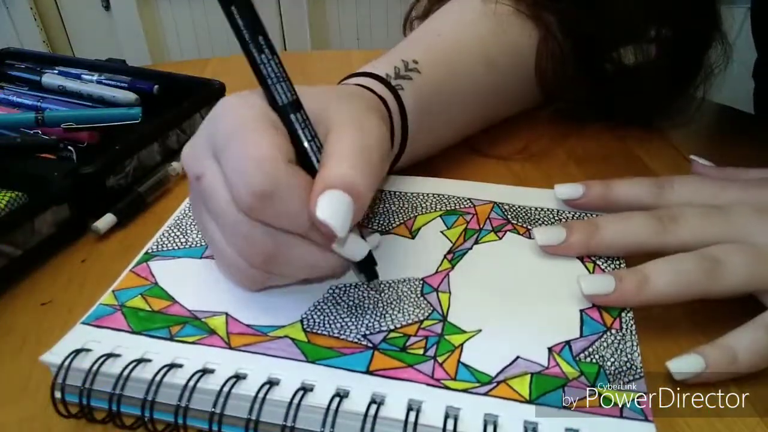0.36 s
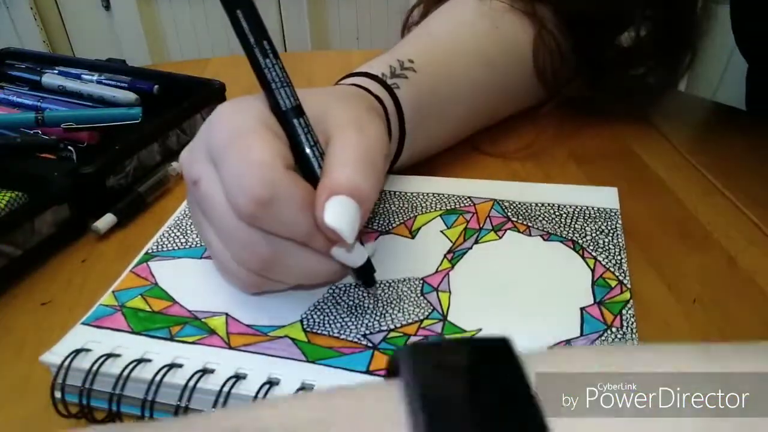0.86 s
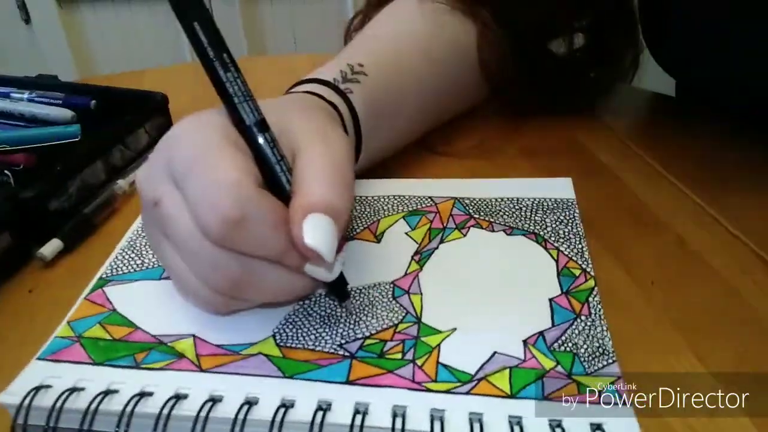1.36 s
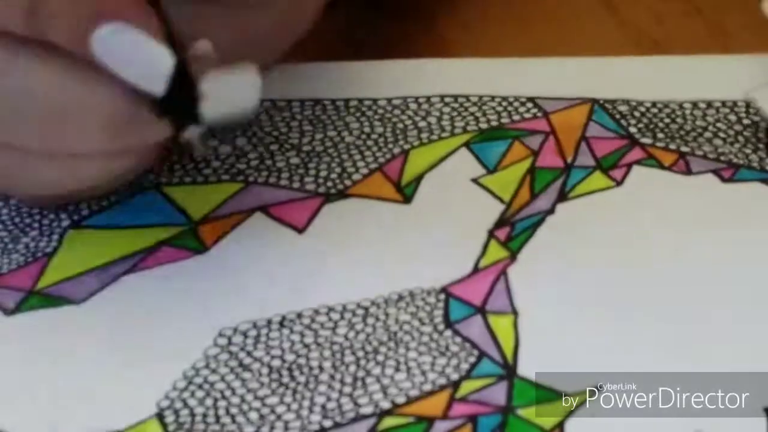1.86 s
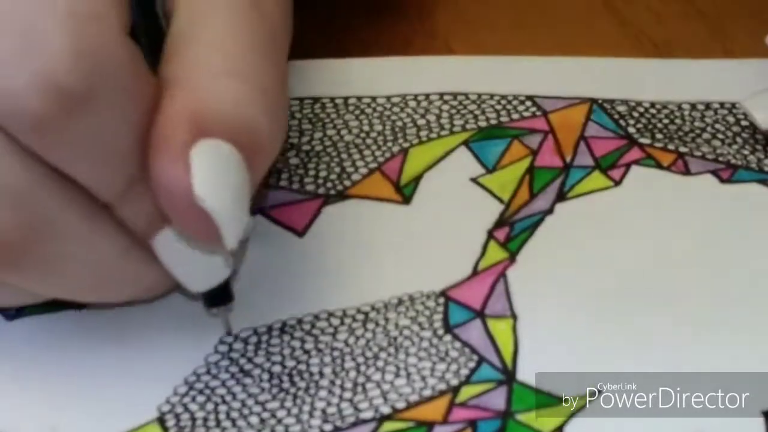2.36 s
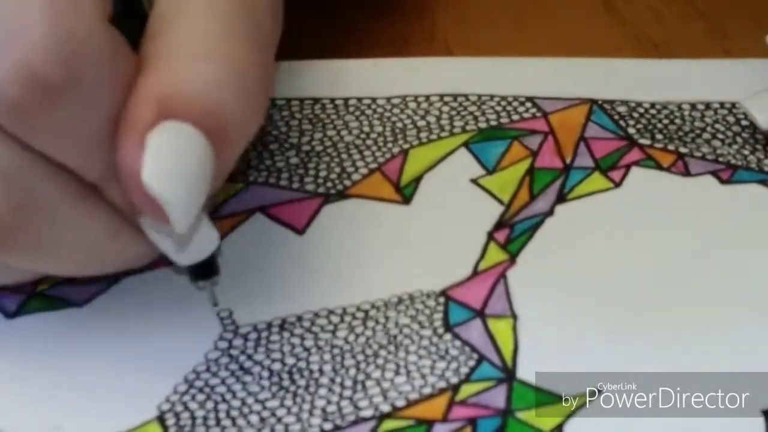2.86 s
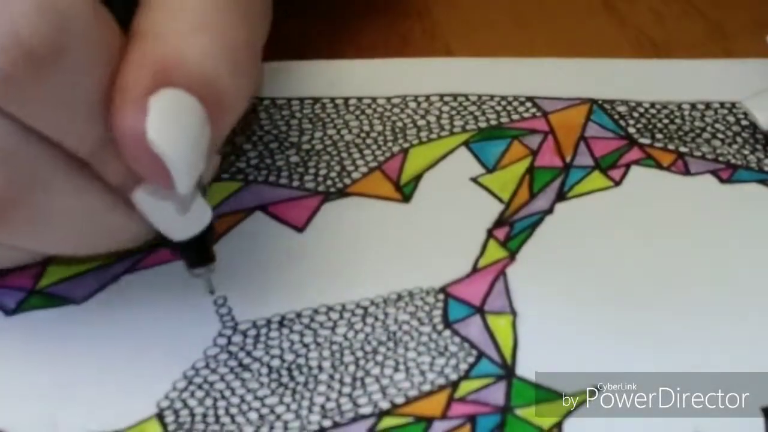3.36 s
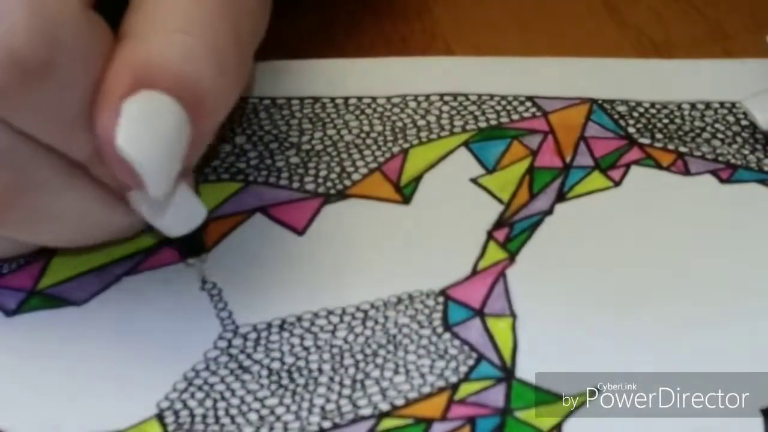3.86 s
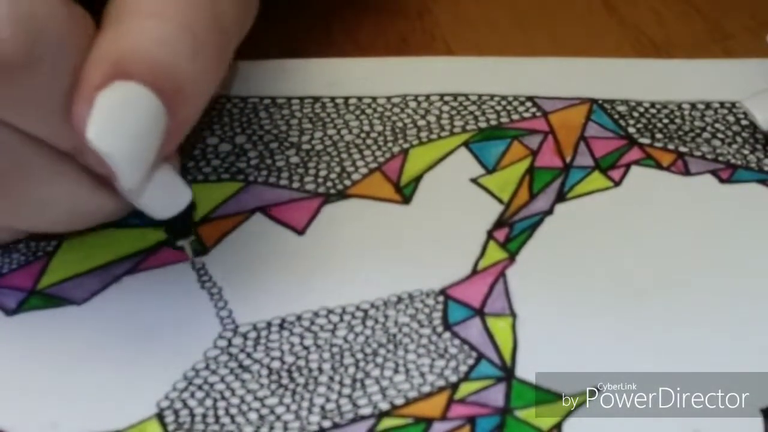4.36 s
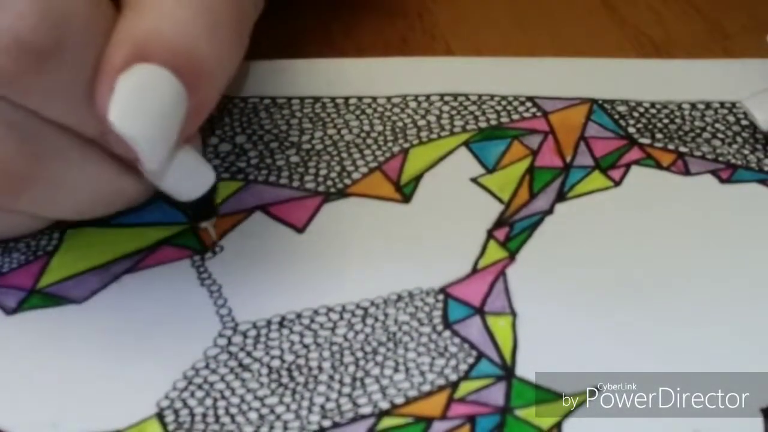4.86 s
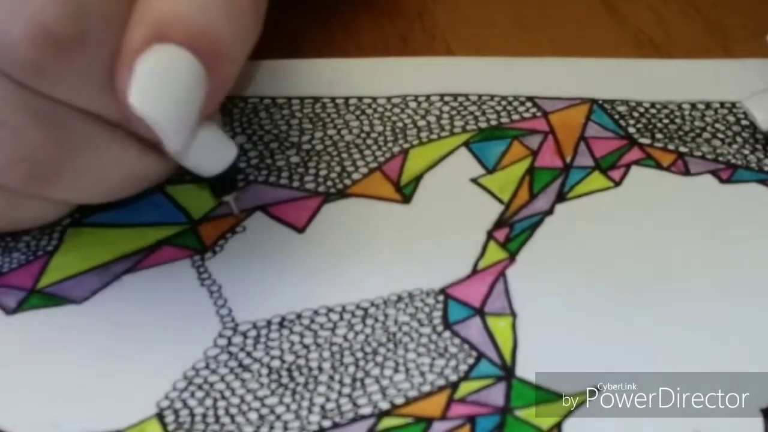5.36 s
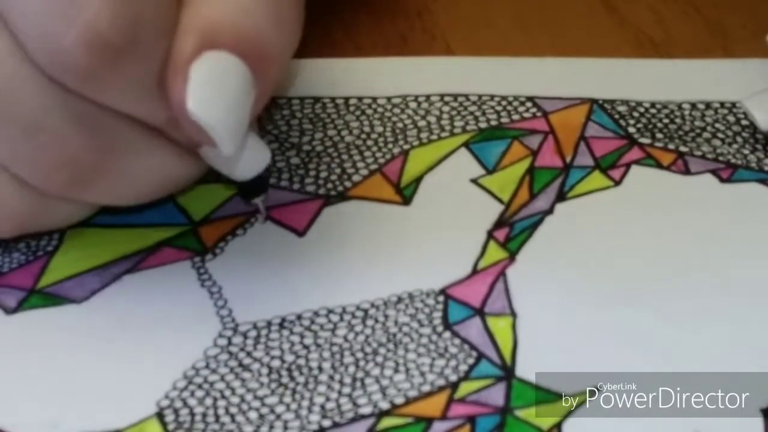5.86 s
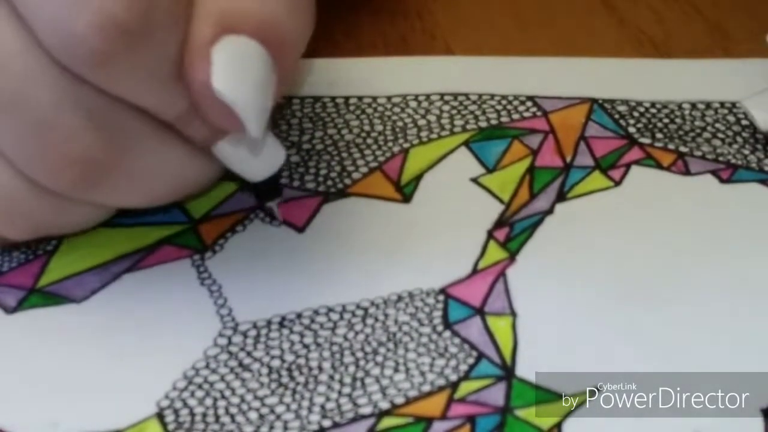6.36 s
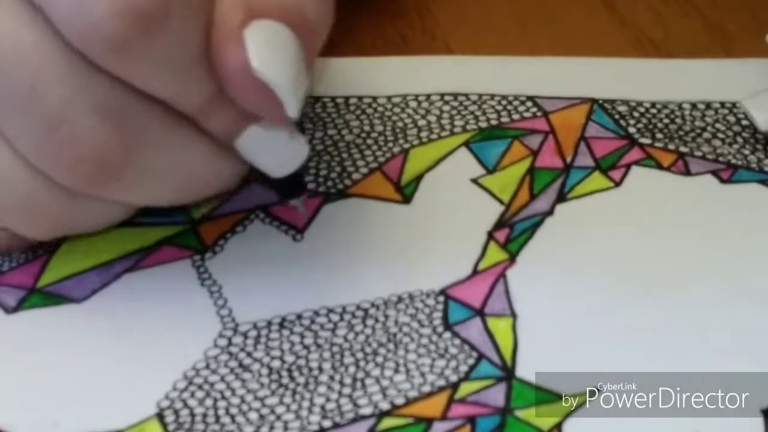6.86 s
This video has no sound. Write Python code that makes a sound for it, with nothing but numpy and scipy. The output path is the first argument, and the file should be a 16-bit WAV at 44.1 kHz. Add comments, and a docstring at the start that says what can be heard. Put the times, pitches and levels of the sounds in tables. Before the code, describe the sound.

Close, dry pen clicks and brief papery rasps as tiny circles are drawn on a pad, irregular and rapid, one knock standing out early.

```python
"""Fine pen on a sketch pad

A fine pen tip draws tiny circles on a thick pad lying on a wooden table, close to a small microphone.
Knocks of the landing, closing and slipping tip are bursts of tiny impacts ringing pad, pen and table.
Between them clumped fibre impacts rasp; low noise is the rumble of hand and room.
A noise gate turns the quiet moments down between strokes."""
import sys
import numpy as np
from scipy import signal
from scipy.io import wavfile
from scipy.ndimage import uniform_filter1d

SR = 44100
rng = np.random.default_rng(int(sys.argv[2]) if len(sys.argv) > 2 else 0)


def transcribe(u):
    """Save the signal u as a 16-bit wav file named by the first command-line argument.

    u: samples, shape (n,) or (channels, n), limited to [-1, 1]; the rate is SR.
    q: integer samples, one column per channel.
    """
    v = np.clip(np.atleast_2d(u).T, -1, 1)
    q = np.round(v * 32767).astype(np.int16)
    wavfile.write(sys.argv[1], SR, q)


def gain_from_db(level_db):
    """Convert decibel levels to linear amplitude factors (20 dB per decade)."""
    decades = np.asarray(level_db, float) / 20
    return 10 ** decades


N = 308259

# resonances of pad and pen, the tip itself last: (centre [Hz], width [Hz], level [dB])
RESONANCES = [(670, 33, -4), (1012, 55, 0.5), (1508.5, 67, -0.5), (2300, 83, -15.5), (3610, 1000, -5),
              (4140, 210, 0), (7528, 460, 11)]
TIP_HZ = RESONANCES[-1][0]


def evened(x):
    """Scales to rms 1."""
    return x / np.sqrt(np.mean(x ** 2) + 1e-20)


def add(mix, start_s, sound):
    """Mixes a sound in at start_s, cut at the end of the mix."""
    part = mix[max(round(start_s * SR), 0):][:len(sound)]
    part += sound[:len(part)]


def colour(points, size=4096):
    """Minimum-phase impulse response with the given spectrum."""
    f, db = np.transpose(points)
    hz = abs(np.fft.fftfreq(size, 1 / SR))
    spectrum_db = np.interp(np.log(hz + 1), np.log(f), db, left=-70, right=-90)
    log_gain = np.log(gain_from_db(spectrum_db))
    return np.fft.ifft(np.exp(np.conj(signal.hilbert(log_gain)))).real[:size // 2]


def resonate(x, hz, width_hz):
    """One-pole complex resonance of gain 1 at hz."""
    r = np.exp(-np.pi * width_hz / SR)
    pole = r * np.exp(2j * np.pi * hz / SR)
    return 2 * signal.lfilter([1 - r], [1, -pole], x).real


def grit(size, per_s, spread_db):
    """Sparse tiny impacts of random sign, a few of them large."""
    chance, sign, height = rng.random((size, 3)).T
    hits = chance < per_s / SR
    return hits * np.sign(sign - 0.5) * gain_from_db(-spread_db * np.log(height + 0.009))


def body(x, shift=0):
    """Pad and pen ring briefly; where the tip touches shifts each resonance in pitch and strength."""
    pitch, strength = shift * rng.standard_normal((len(RESONANCES), 2)).T
    pitch[-1] *= 0.3  # the tip itself nearly keeps its pitch
    out = x
    for (hz, width_hz, db), f, a in zip(RESONANCES, pitch, strength):
        out = out + gain_from_db(db + 1.3 * a) * resonate(x, hz * (1 + 0.068 * f), width_hz)
    return out


def table_thud(t):
    """Decaying modes of the table, stirred differently by each knock, swelling more slowly than the paper."""
    # modes of the table: (pitch [Hz], level [dB], t60 [s])
    modes = [(129, -7, 0.13), (165, -0.5, 0.071), (215, 1.5, 0.042), (323, -9, .04), (480, -4, 0.026)]
    spread_db, swell_s = 2, 0.004
    thud = np.zeros(len(t))
    for hz, db, t60_s in modes:
        level = gain_from_db(db + spread_db * rng.standard_normal() - 60 * t / t60_s)
        cycles = hz * rng.uniform(0.94, 1.08) * t + rng.random()
        thud += level * np.sin(2 * np.pi * cycles)
    thud = thud * (1 - np.exp(-t / swell_s))
    return thud / abs(thud).max()


def tick(peak_db, ring_hz, sharp_db, thud_db, t60_s, pad):
    """The tip chatters for a few ms, then the fibres and pages settle in sparse crackles."""
    touch_s, first_blow, first_blow_s = 0.0008, 0.61, 0.0025
    split_hz = 5200
    t = np.arange(5000) / SR
    t60_s = np.clip(t60_s, 0.006, 0.1)

    onset = np.minimum(t / touch_s + 0.22, 1)
    blow = 1 + first_blow * np.exp(-t / first_blow_s)  # first contact is harder than the chatter
    chatter = onset * blow * gain_from_db(-60 * np.maximum(t - 0.037 * t60_s, 0) / t60_s)
    settling = gain_from_db(-17.5 - 60 * t / (0.042 + 0.39 * t60_s))
    contact = chatter * evened(grit(len(t), per_s=8100, spread_db=5))
    contact = contact + settling * evened(grit(len(t), per_s=1700, spread_db=8))

    knock = body(signal.oaconvolve(contact, pad)[:len(t)], shift=0.51)
    knock = knock + gain_from_db(2.5) * resonate(knock, ring_hz, 230)
    low = signal.sosfilt(signal.butter(3, split_hz, fs=SR, output="sos"), knock)
    high = signal.sosfilt(signal.butter(3, split_hz, "high", fs=SR, output="sos"), knock)
    # the treble fades first while the tip keeps ringing
    high = high * (gain_from_db(-60 * t / 0.039) + 0.18) + 0.24 * resonate(high, TIP_HZ, 1500)
    knock = low / abs(low).max() + gain_from_db(sharp_db) * high / abs(high).max()
    return gain_from_db(peak_db) * (knock + gain_from_db(thud_db) * table_thud(t))


def ticks():
    """Every landing, closing and slip of the tip; the fainter slips are duller."""
    # peak: of the part below 5200 Hz; sharpness (peak above 5200 Hz) and thud are relative to it
    # tip comes down: (time [s], peak [dB], strongest pad ring [Hz], table thud [dB], sharpness [dB])
    landings = [(0.228, -16, 2210, -20.5, 1), (0.441, -10, 1780, -29, -7), (0.687, -9, 2660, -34, -9),
                (0.822, -3, 1960, -33, -8), (1.084, -12, 2140, -31.5, -2), (1.3, -8, 2330, -37, -9),
                (1.668, 5, 2030, -27, -6), (2.24, -1, 3430, -29.5, -11), (2.419, -4.5, 2240, -36.5, -10.5),
                (2.597, -7, 1670, -27.5, -6), (2.803, -6, 1680, -36, -11), (2.936, -14, 2360, -20, -10),
                (3.086, -16, 1420, -29.5, -6), (3.286, -9, 2380, -27, -17.5),
                (3.528, -4.5, 2990, -43, -9.5), (3.84, -8, 3390, -27.5, -8), (4.036, -5, 2130, -37.5, -6.5),
                (4.39, -8, 2350, -32.5, -7.5), (4.678, -6, 2276, -32, -4.5),
                (4.846, -10.5, 2660, -33.5, -20), (5.063, -11.5, 2240, -40, -7.5),
                (5.253, -9.5, 2530, -21.5, -8), (5.413, -17.5, 2370, -28.5, 0),
                (5.694, -13.5, 1940, -34, -8.5), (5.942, -13, 2550, -30, -12.5),
                (6.191, -7, 2270, -32.5, -4.5), (6.417, -6.5, 2190, -43, -7),
                (6.678, -15.5, 1490, -44, -9.5), (6.802, -6, 2430, -48.5, -9.5)]
    # light snaps, mostly as a circle closes:
    # (time [s], peak [dB], strongest pad ring [Hz], sharpness [dB], t60 [s])
    closings = [(0.06, -10.5, 3280, -8, 0.037), (0.312, -15, 2160, -3.5, 0.052),
                (0.524, -8.5, 2080, -8, 0.032), (0.87, -13.5, 1980, -3.5, 0.034),
                (0.939, -15.5, 2180, -8, 0.038), (1.168, -11, 2100, -5.5, 0.038),
                (1.379, -12, 2180, -3, 0.053), (1.736, -12, 2990, -4, 0.051),
                (2.036, -10.5, 2370, -7.5, 0.019), (2.32, -8, 2100, -6, 0.039),
                (2.498, -14.5, 1910, -5, 0.039), (2.69, -9, 2170, -17, 0.015),
                (2.887, -14, 2780, -12, 0.034), (3.058, -18.5, 2270, -17, 0.021),
                (3.18, -14.5, 2150, -8, 0.04), (3.378, -6.5, 3750, -7.5, 0.019),
                (3.615, -8.5, 3100, -5.5, 0.033), (3.834, -13, 3180, -2.5, 0.028),
                (3.941, -24, 1810, -9, 0.049), (4.12, -14, 2350, -6.5, 0.046),
                (4.255, -13.5, 3000, 0, 0.024), (4.35, -22.5, 2310, -4, 0.036),
                (4.491, -14, 2350, -8.5, 0.038), (4.77, -16, 1660, -4, 0.052),
                (4.979, -33, 1530, -17.5, 0.072), (5.143, -9.5, 2340, -9, 0.036),
                (5.358, -10, 3850, -6, 0.011), (5.534, -14.5, 2310, -8.5, 0.038),
                (5.802, -11.5, 3070, -7, 0.045), (6.015, -13, 2330, -11, 0.028),
                (6.032, -12, 2380, -7, 0.026), (6.283, -14, 2210, -7.5, 0.029),
                (6.518, -17, 2330, -9, 0.042), (6.896, -9.5, 2570, -11, 0.044)]
    # tip rebounds or catches on a fibre: (time [s], peak [dB])
    slips = [(.238, -19.5), (0.275, -39), (.300, -47.5), (0.353, -54), (.369, -39.5), (.450, -21.5),
             (.477, -30.5), (.534, -26.5), (.555, -44.5), (0.591, -46), (.694, -13.5), (0.827, -7.5),
             (0.835, -35.5), (.877, -21.5), (0.907, -29), (1.099, -17.5), (1.109, -43), (1.114, -24.5),
             (1.122, -39), (1.31, -28), (1.319, -36), (1.336, -41.5), (1.386, -28), (1.411, -40.5),
             (1.432, -48), (1.449, -48), (1.664, -18.5), (1.691, -22), (1.712, -23.5), (1.73, -32),
             (1.757, -22), (1.784, -46), (1.987, -47), (1.991, -50), (2.057, -37), (2.074, -43.5),
             (2.105, -51), (2.331, -30), (2.504, -44.5), (2.613, -27.5), (2.619, -28), (2.627, -37),
             (2.681, -33.5), (2.708, -30.5), (2.819, -33.5), (2.896, -22.5), (2.92, -62), (3.108, -32),
             (3.300, -37), (3.308, -34), (3.319, -30.5), (3.340, -36.5), (3.384, -15), (3.858, -37),
             (3.865, -35), (3.871, -45.5), (4.263, -7), (4.386, -15), (4.41, -42), (4.416, -36),
             (4.779, -27), (4.790, -40), (4.855, -31), (4.862, -20.5), (4.993, -42), (5.076, -23.5),
             (5.114, -30), (5.259, -14.5), (5.269, -27), (5.280, -22), (5.366, -21), (5.423, -19.5),
             (5.444, -33), (5.724, -31), (5.763, -30), (5.964, -40.5), (5.974, -41), (5.998, -34),
             (6.047, -29), (6.054, -32), (6.197, -13), (6.720, -50), (6.902, -39)]
    # broad colour of pad and microphone: (frequency [Hz], level [dB])
    pad_colour = [(250, -32), (450, -19.5), (1050, -7), (2280, 0), (4300, -7.5), (5300, -10), (8700, -20.5),
                  (11000, -18), (15000, -26.5), (16400, -67.5)]
    land_t60_s, close_thud_db = 0.036, -47.5
    slip_ring_hz, slip_thud_db, slip_t60_s = 2300, -42, 0.0063
    slip_sharp_db, slip_spread_db, dulling_db_per_db = -6, 2.5, 0.25

    out, pad = np.zeros(N), colour(pad_colour)
    for s, db, hz, thud_db, sharp_db in landings:
        add(out, s, tick(db, hz, sharp_db, thud_db, land_t60_s, pad))
    for s, db, hz, sharp_db, t60_s in closings:
        add(out, s, tick(db, hz, sharp_db, close_thud_db, t60_s, pad))
    for s, db in slips:
        sharp_db = slip_sharp_db + dulling_db_per_db * db + slip_spread_db * rng.standard_normal()
        add(out, s, tick(db, slip_ring_hz, sharp_db, slip_thud_db, slip_t60_s, pad))
    return out


def rasp():
    """The tip skips over fibres: dense impacts in clumps of a few ms, each stroke with its own colour."""
    # pushes of the tip, levels ahead of paper and body resonances:
    # (time [s], length [s], start level [dB], end level [dB], strongest pad ring [Hz])
    drags = [(0.002, 0.016, -35, -59, 2030), (0.033, 0.041, -49, -51, 2300), (0.258, 0.047, -52, -53, 2120),
             (0.474, 0.05, -36.5, -53, 2000), (0.728, 0.16, -44, -85, 1030), (0.839, 0.031, -36, -60, 2360),
             (0.896, 0.034, -57, -52.5, 2300), (1.101, 0.061, -41.5, -51.5, 2230),
             (1.331, 0.043, -38.5, -47, 2360), (1.682, 0.087, -37, -53, 2200),
             (1.985, 0.079, -48, -59, 2100), (2.259, 0.055, -44, -51.5, 800),
             (2.457, 0.044, -49, -53, 2660), (2.618, 0.027, -43, -54.5, 1550),
             (2.649, 0.032, -45.5, -49, 3920), (2.842, 0.074, -50, -70, 825),
             (2.955, 0.037, -36, -82, 1070), (3.001, 0.041, -51, -70.5, 1020),
             (3.047, 0.0099, -46.5, -54, 3220), (3.1, 0.042, -34.5, -72, 2320),
             (3.142, 0.044, -44, -60, 1550), (3.29, 0.041, -33, -53.5, 2260),
             (3.336, 0.05, -50.5, -63, 1510), (3.56, 0.073, -54.5, -46, 2300),
             (3.85, 0.072, -44, -67.5, 2300), (3.92, 0.021, -64, -45.5, 4300),
             (4.071, 0.079, -40.5, -61, 1100), (4.294, 0.081, -46.5, -52.5, 1130),
             (4.4, 0.047, -29, -81, 2240), (4.446, 0.038, -65.5, -50, 870),
             (4.718, 0.072, -46.5, -68, 2380), (4.855, 0.055, -41, -74.5, 790),
             (4.903, 0.037, -42.5, -58, 2400), (4.945, 0.024, -53, -50, 3520),
             (5.1, 0.059, -43, -55.5, 2350), (5.264, 0.036, -28, -52, 1070), (5.305, 0.044, -38, -53, 2040),
             (5.426, 0.031, -33, -46.5, 2900), (5.464, 0.11, -48.5, -61, 1970),
             (5.725, 0.049, -49, -69, 2270), (5.757, 0.065, -51, -50, 1050), (5.959, 0.032, -43, -58, 1560),
             (5.995, 0.02, -53, -52, 1020), (6.226, 0.086, -45, -60.5, 2930),
             (6.454, 0.053, -44, -46.5, 3700), (6.706, 0.05, -47.5, -57, 1090),
             (6.765, 0.026, -54.5, -55, 2480), (6.839, 0.04, -50.5, -59.5, 1550),
             (6.883, 0.0079, -60, -44, 4250)]
    # colour of the rasp: (frequency [Hz], relative level [dB])
    rasp_colour = [(100, -26.5), (315, -14.5), (1100, -5), (2370, -2), (4300, -13.5), (5500, -18.5),
                   (9000, -32.5), (15000, -31.5), (16400, -50)]
    push_s, lift_s = 0.003, 0.004
    ring_db, ring_width_hz = 1, 350
    sizzle_db, sizzle_spread_db, sizzle_width_hz = 2, 5, 350

    out, paper = np.zeros(N), colour(rasp_colour)
    paper = paper / np.linalg.norm(paper)
    for s, length_s, start_db, end_db, ring_hz in drags:
        t = np.arange(0, length_s + lift_s, 1 / SR)
        fade = np.clip(np.minimum(t / push_s, (t[-1] - t) / lift_s), 0, 1)
        level = gain_from_db(start_db + (end_db - start_db) * t / length_s) * fade
        clumps = uniform_filter1d(rng.standard_normal(8000), 70)
        clumps = evened(uniform_filter1d(clumps, 70))
        fibres = (grit(8000, per_s=3000, spread_db=3) * gain_from_db(3.1 * clumps))[:len(t)]
        stroke = signal.oaconvolve(evened(fibres) * level, paper)
        stroke = stroke + gain_from_db(ring_db) * resonate(stroke, ring_hz, ring_width_hz)
        # the tip sings more on some strokes than on others
        sizzle = gain_from_db(sizzle_db + sizzle_spread_db * rng.standard_normal())
        sizzle_hz = TIP_HZ * rng.uniform(0.96, 1.04)
        stroke = stroke + sizzle * resonate(stroke, sizzle_hz, sizzle_width_hz)
        add(out, s, gain_from_db(-4.5) * body(stroke, shift=0.86))
    return out


def room():
    """Low rumble of hand and room: coloured noise that comes and goes."""
    # colour of the rumble: (frequency [Hz], relative level [dB])
    rumble_colour = [(70, -30), (120, 3), (240, -10), (400, -5.5), (800, -12.5), (2000, -23), (15000, -38)]
    # hand resting and shifting on pad and table, ahead of the gate: (time [s], rms level [dB])
    rumble_level = [(0, -52), (0.149, -73.5), (1.002, -78), (1.8, -70), (1.96, -78), (2.1, -69.5),
                    (2.3, -78), (3.102, -69), (3.5, -79.5), (4, -74), (4.452, -71), (4.899, -81),
                    (5.45, -71), (5.7, -69), (6.2, -74.5), (6.99, -69.5)]
    s, db = np.transpose(rumble_level)
    rumble = evened(signal.oaconvolve(rng.standard_normal(N), colour(rumble_colour))[:N])
    return gain_from_db(np.interp(np.arange(N) / SR, s, db)) * rumble


def scene():
    """Pen, paper and room, one channel."""
    return (ticks() + rasp() + room())[None]


def low_pass(x):
    """Removes everything above the highest recorded frequency."""
    return signal.sosfilt(signal.butter(12, 16520, fs=SR, output="sos"), x)


def record(dry):
    """The gate turns quiet moments further down; loud knocks round off; no deep bass passes."""
    threshold_db, deepest_db, ceiling = -58, -18, 0.85
    power = uniform_filter1d(uniform_filter1d(dry[0] ** 2, 1100), 1100)
    level_db = 10 * np.log10(abs(power) + 1e-14)
    shut_db = np.clip(level_db - threshold_db, deepest_db, 0)  # 1 dB per dB below threshold
    gate = gain_from_db(uniform_filter1d(shut_db, 900))
    rounded = ceiling * np.tanh(dry / ceiling * gate)
    bass_cut = signal.butter(4, 110, "high", fs=SR, output="sos")
    return low_pass(signal.sosfilt(bass_cut, rounded))


dry = scene()
out = record(dry)
transcribe(out)
```